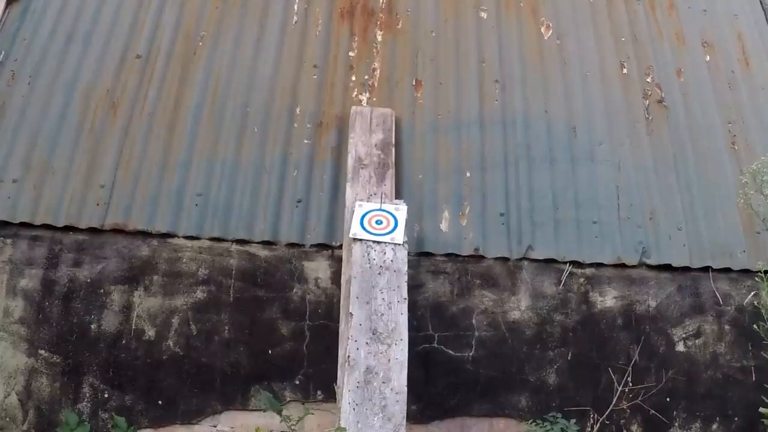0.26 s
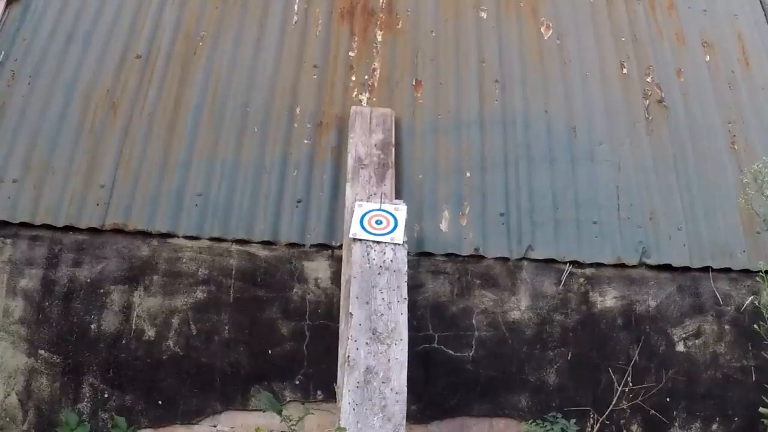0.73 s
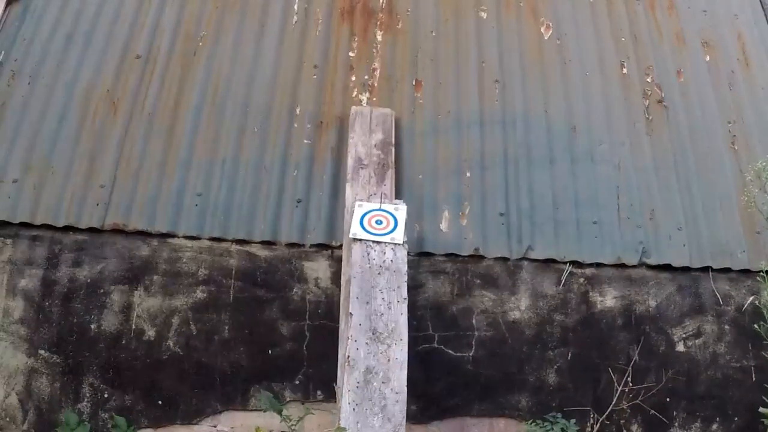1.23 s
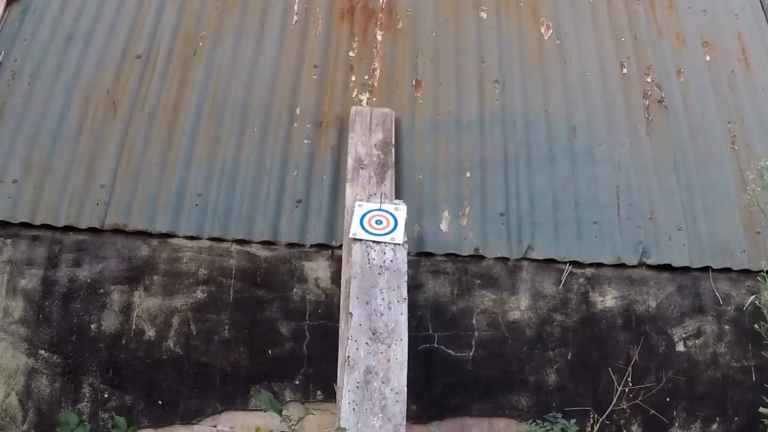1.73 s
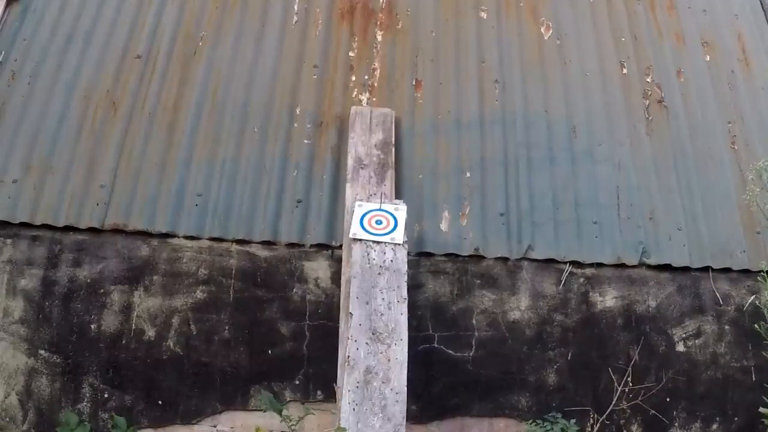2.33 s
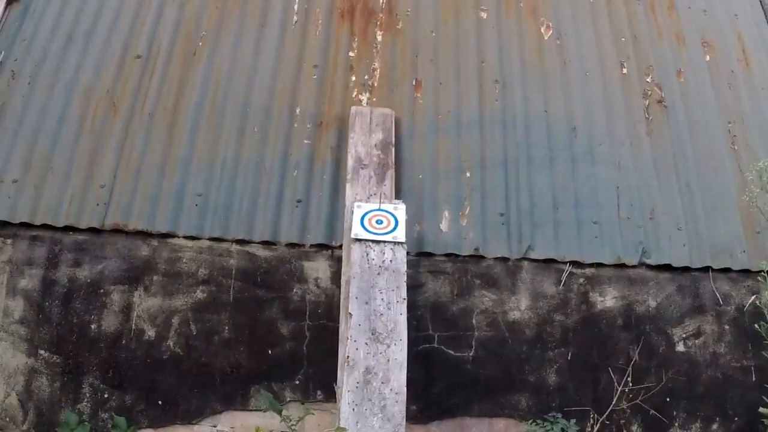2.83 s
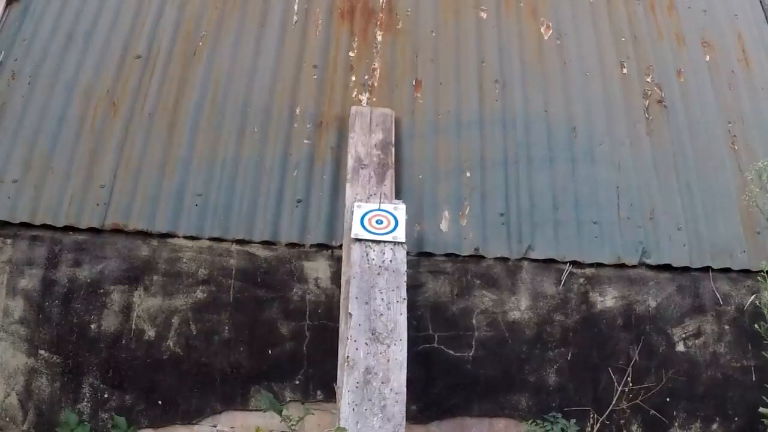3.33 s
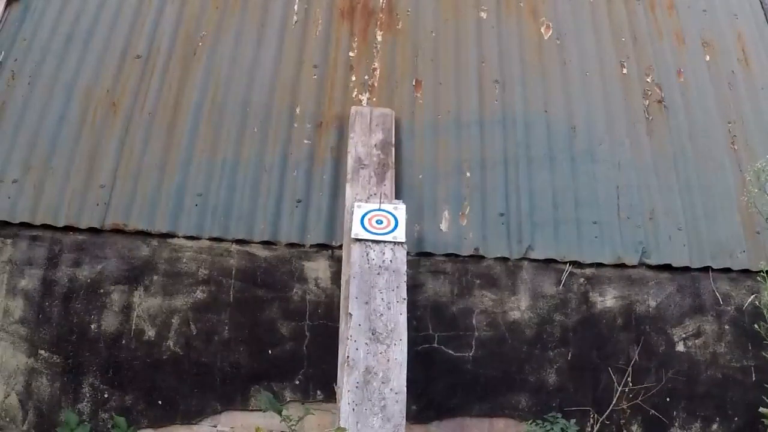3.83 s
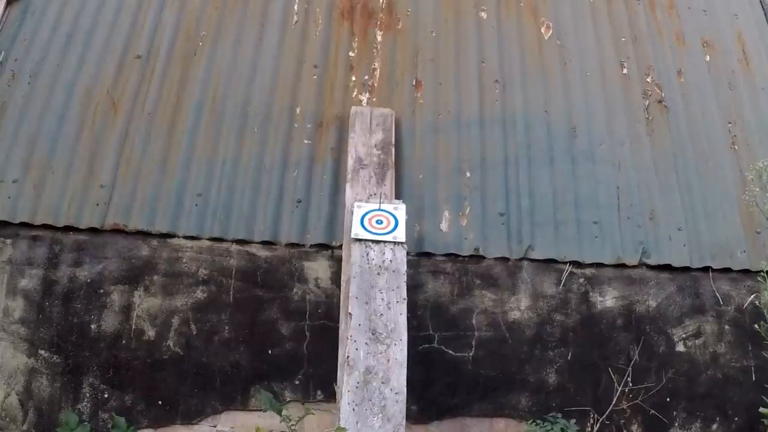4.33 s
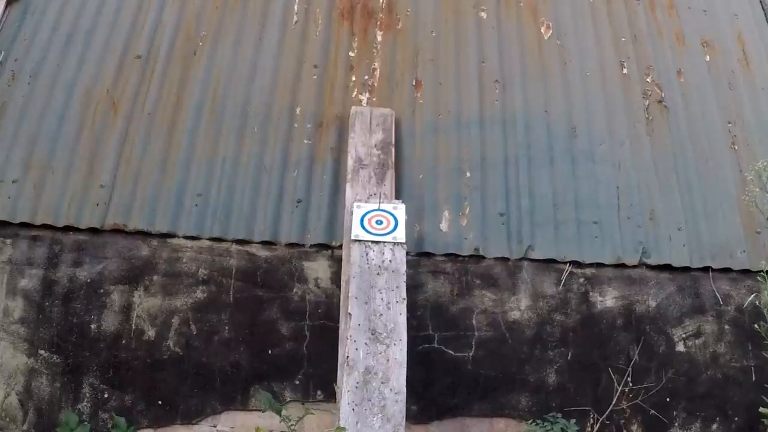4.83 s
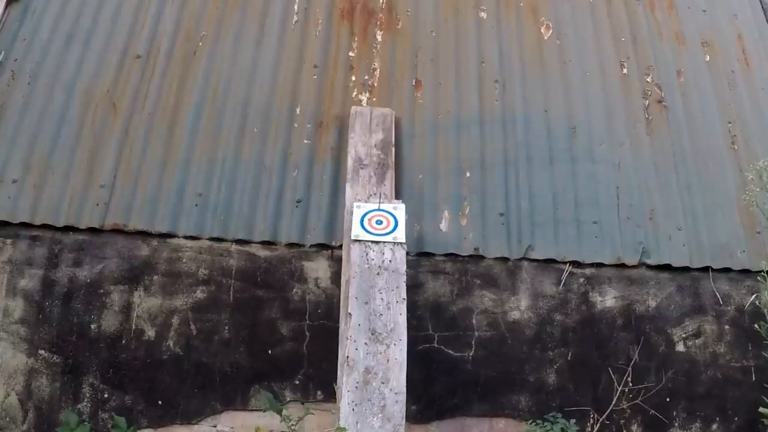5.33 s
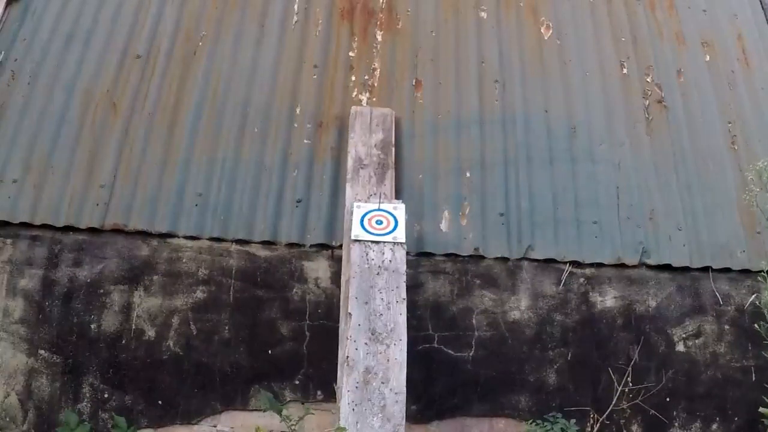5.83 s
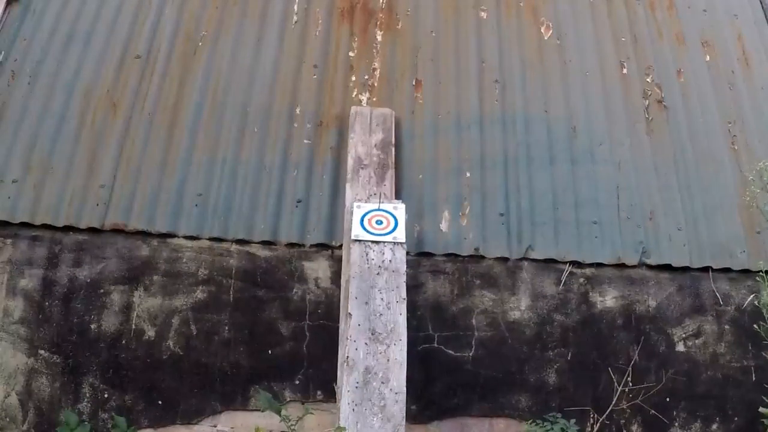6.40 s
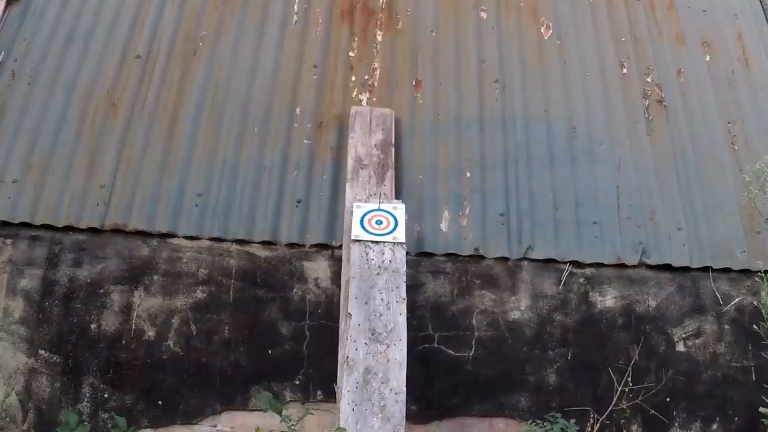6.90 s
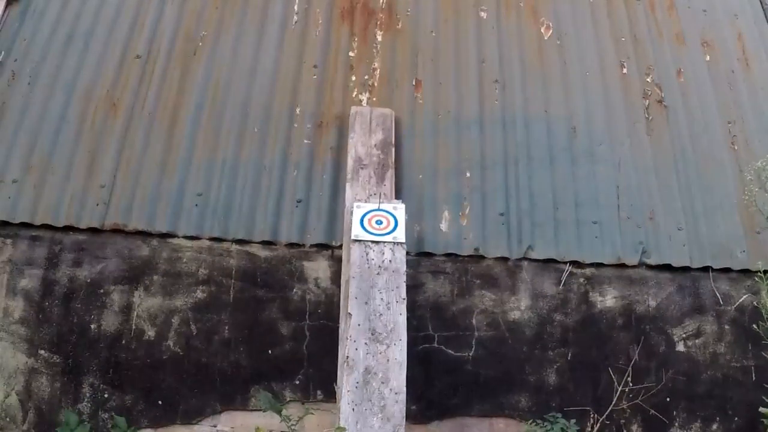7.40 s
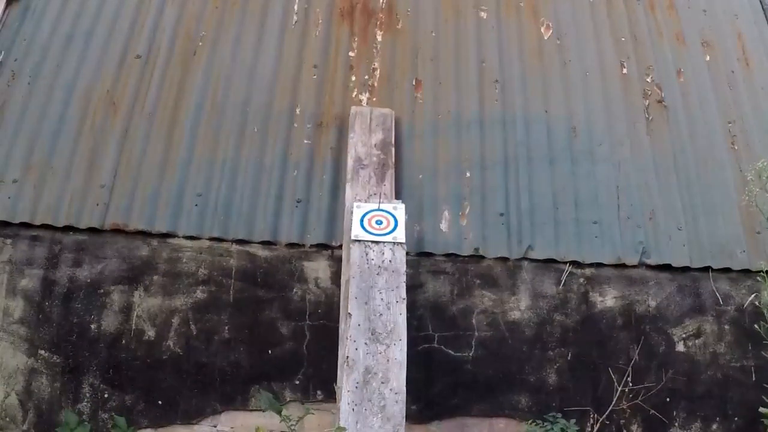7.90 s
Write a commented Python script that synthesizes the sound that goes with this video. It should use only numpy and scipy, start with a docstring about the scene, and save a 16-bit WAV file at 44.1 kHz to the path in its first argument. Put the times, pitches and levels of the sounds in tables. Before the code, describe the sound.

A quiet yard with a thin, slightly wavering high hiss, an air gun handled close to the microphone. At 0.4 s comes the strongest snap: three sharp contacts within a few milliseconds, a short bright metallic ring and a faint hollow low tail. A breathy swish of air swells, peaks near 0.8 s and dies away, with a tiny scuff at 1.1. A light latch click falls at 1.5, then a dull touch. A lighter snap, slightly left, comes at 2.7; faint bird-like whistles lie around 2.4 to 3.4. Another touch and click follow at 3.5, with soft insect-like chirrs from 3.7 to 5.4. A dry, sharp snap at 4.8, a click at 5.8, then a full snap at 6.8 followed by a left-side click. Dry scuffs, mostly left, run from 6.6 to 7.8, with another click at 7.8. A last lighter snap lands at 8.1. The hiss dips briefly around each snap.

```python
"""An air gun is worked close by in a quiet yard: five snaps, each three sharp contacts exciting the body.
Contacts are decaying pulses with noise rattles; the body answers with damped sines and shaped noise.
Lighter latch clicks and dull touches fall between, and low tones and a wash linger after each snap.
A swish of swelling noise follows the first snap; dry scuffs, mostly on the left, are noise under short bells.
A thin wavering hiss with faint chirrs and whistles lies beneath and dips briefly around each snap."""
import sys
import numpy as np
from scipy.fft import rfft, irfft, next_fast_len
from scipy.io import wavfile
from scipy.ndimage import map_coordinates

SR = 44100
rng = np.random.default_rng(int(sys.argv[2]) if len(sys.argv) > 2 else 0)


def transcribe(signal):
    """Save signal, clipped to [-1, 1], as a 16-bit WAV file at the path in sys.argv[1]."""
    frames = np.atleast_2d(signal).T
    limited = np.clip(frames, -1, 1)
    pcm = np.round(limited * 32767).astype(np.int16)
    wavfile.write(sys.argv[1], SR, pcm)


N = 359415
TIME = np.arange(N) / SR
SHORT = np.arange(SR // 8) / SR  # time axis of one brief sound, s

# Base level of the hiss, before the offset of each band: [t/s, level/dB]
HISS_LEVEL = [(1.05, -49), (1.86, -49.5), (2.29, -49), (4.29, -51), (4.87, -50.5), (6.29, -49.5),
              (6.82, -50.5), (6.98, -49.5), (7.58, -51), (8.15, -49.5)]
# Spectra of the hiss, its top fizz and its low floor: [f/Hz, relative level/dB]
HISS_SPECTRUM = [(1120, -28), (1900, -7), (2170, -2.5), (2790, -3), (3410, -7.5), (3860, -2.5),
                 (4230, -4.5), (4430, -2), (4720, -7.5), (4820, -5.5), (5600, -12), (7280, -40),
                 (12300, -120)]
FIZZ_SPECTRUM = [(3180, -38), (5400, -17), (5700, -7.5), (6270, -4), (8470, -7.5), (15100, -6),
                 (16000, -4.5)]
LOW_SPECTRUM = [(15, -36), (25, -3.5), (227, -4.5), (253, -1), (281, -5.5), (414, -3.5), (933, -4.5),
                (1700, -4), (2210, -5), (3740, -120)]
# Spectrum of the rustle within the hiss: [f/Hz, relative level/dB]
RUSTLE_SPECTRUM = [(2500, -50), (4200, 1), (5300, -5.5), (6500, -3.5), (9000, -12), (15000, -49)]
# Left-right correlation of the background: [f/Hz, correlation]
BACKGROUND_CORRELATION = [(60, 0.031), (150, 0.12), (380, 0.17), (950, 0.0076), (2380, 0.34),
                          (5980, -0.019), (15000, -0.76)]
# Faint chirrs: [t/s, f/Hz]
CHIRR_EVENTS = [(3.726, 4500), (4.38, 4400), (4.99, 4050), (5.357, 4290)]
# Faint whistles: [t/s, peak level/dB, f/Hz]
WHISTLE_EVENTS = [(2.43, -58, 4550), (2.92, -55, 4605), (3.1, -57, 4555), (3.42, -51.5, 4580)]
# Soft scuffs: [t/s, level/dB, standard deviation of the bell/s]
SCUFF_EVENTS = [(1.093, -42, 0.0025), (6.555, -42, 0.017), (6.582, -39, 0.0054), (7.039, -41, 0.0076),
                (7.121, -43.5, 0.018), (7.214, -44.5, 0.007), (7.545, -37, 0.0016), (7.596, -48, 0.023),
                (7.6105, -33.5, 0.002), (7.6175, -30.5, 0.0015), (7.812, -44, 0.013)]
# Spectrum of a scuff: [f/Hz, relative level/dB]
SCUFF_SPECTRUM = [(200, -45), (1400, -43), (1900, 3.5), (2400, 7), (3500, -4), (5000, -13), (12000, -51)]
# Spectra of the swish's main flow and bright edge: [f/Hz, relative level/dB]
AIR_SPECTRUM = [(1120, -34), (1900, -0.5), (2740, -1), (3050, -1), (4020, -4), (7840, -17.5), (8500, -22),
                (14600, -18), (16000, -29)]
EDGE_SPECTRUM = [(2000, -23), (5000, 1.5), (8000, 1.5), (13000, -4.5), (16000, -6)]
# Spectrum of the low rush, also of the lingering wash: [f/Hz, relative level/dB]
RUSH_SPECTRUM = [(30, -27), (100, -7.5), (250, -7.5), (450, -4.5), (560, -8), (800, -2), (1300, -3.5),
                 (1800, -2), (2400, -39)]
# Resonances in the low rush: [f/Hz, width/Hz, gain/dB]
RUSH_RESONANCES = [(260.6, 16, 13), (422, 20, 13), (664, 29, 13.5), (1330, 40, 2)]
# Faint lingering tones: [f/Hz, relative level/dB, t60/s]
HOLLOW_TONES = [(267, 0, 0.63), (420, 1, 0.66), (650, -4, 0.5), (950, -9, 0.55), (1280, -11, 0.27)]
# Light latch clicks: [t/s, spike level/dB, thud level/dB, left-right difference/dB]
LATCH_CLICKS = [(1.4952, -14.5, -29, -2), (3.5763, -18.5, -33.5, 1.5), (5.7638, -18, -23.5, 1),
                (6.8514, -16, -25.5, 9), (6.8861, -34.5, -45, 12), (7.7892, -18, -50, 0.5)]
# Spectrum of the crowded body modes: [f/Hz, relative level/dB]
BODY_SPECTRUM = [(1500, -27), (2050, -6), (2500, -1), (3100, -5), (3800, -0.5), (4400, -16.5), (4800, -9),
                 (5600, -20), (9000, -34)]
# Spectrum of the sizzle of thin steel parts: [f/Hz, relative level/dB]
SIZZLE_SPECTRUM = [(5000, -21), (10500, -5), (12500, 8), (15500, 0), (17000, -23)]
# Spectrum of the rattle of a contact: [f/Hz, relative level/dB]
RATTLE_SPECTRUM = [(60, -2), (300, -1.5), (1100, 6), (1700, -6), (2300, 5), (4000, 4), (7000, 6),
                   (12000, 6.5), (15800, 3), (16900, -29)]
# Snaps of the action: [t/s, opening contact level/dB, closing contact level/dB, force on the body/dB,
# left-right difference/dB, dip of the quiet sounds/dB]
SNAP_EVENTS = [(0.3966, -27, -4.5, 2.5, 0.5, 9.5), (2.7162, -26, -5.5, -14, 4, 3),
               (4.8060, -2.5, -17, -20, 1, 11.5), (6.7680, -5, -4, -0.5, -0.5, 9),
               (8.1365, -15.5, -11.5, -14, 2, 10)]

# Background. Band offsets are relative to the base level of the hiss.
TOP_HZ = 16900  # upper limit of the whole sound
HISS_START_HZ, HISS_TOP_HZ = 1857, 15900  # steep edges of the thin bands
HISS_OFFSET_DB, FIZZ_OFFSET_DB = 0.48, -1.07
RUSTLE_OFFSET_DB, RUSTLE_SWING_DB, RUSTLE_RATE = -13, 3, 9.1  # rate: random knots a second
CHIRR_GAIN_DB, CHIRR_S, CHIRR_WIDTH_HZ = -47.5, 0.042, 360
WHISTLE_S, WHISTLE_WAVER_HZ = 0.06, 9.1
SCUFF_PAN_DB, SCUFF_GRAIN_DB, SCUFF_GRAIN_RATE = 16, 1.8, 250  # L-R; unevenness; knots a second

# Swish: time of its height, half-width of its core, power-law steepness of its flanks
SWISH_S, SWISH_WIDTH_S, SWISH_FALL = 0.781, 0.023, 0.61
SWISH_START_S, SWISH_ATTACK_S = 0.44, 0.065  # the air begins to move and fades in
SWISH_FLUTTER_DB, SWISH_FLUTTER_RATE = 1.1, 220  # unevenness of the flow; knots a second
AIR_DB, EDGE_DB = -28.5, -30.5
EDGE_LEAD_S, EDGE_WIDTH_S, EDGE_FALL = 0.007, 0.034, 2.1  # the edge peaks earlier, with steeper flanks
RUSH_DB, RUSH_LAG_S = -46.5, 0.017  # the low rush peaks just after
RUSH_RISE_DB_PER_S, RUSH_FALL_DB_PER_S = 252, 182

# Gun. GAIN is in dB at full force or contact; GROWTH is in dB per dB of force or contact.
CATCH_DELAY_S, CLOSE_DELAY_S = 0.0045, 0.0059  # after the opening contact
CATCH_SPIKE_DB, CATCH_RATTLE_DB = -16, -15.5  # alike in every snap
OPEN_RATTLE_GAIN, OPEN_RATTLE_GROWTH = -14.5, 0.28
CLOSE_RATTLE_GAIN, CLOSE_RATTLE_GROWTH = -14.5, 0.95
LATCH_RATTLE_GAIN, LATCH_RATTLE_GROWTH = -24, 0.31
THUD_DB = -19  # low push of a contact, relative to its spike
TOUCHES_S, TOUCH_DB = [1.579, 3.522, 5.738, 7.861], -41  # faint dull touches on the gun
RING_GAIN, RING_GROWTH = -18.5, 0.83
NOTE_GAIN, NOTE_GROWTH = -10.5, 2.2
SIZZLE_GAIN, SIZZLE_GROWTH = -21.5, 1.1
KNOCK_GAIN, KNOCK_GROWTH = -20.5, 1.8
LINGER_GAIN, LINGER_GROWTH = -62, 1.17


def amp(db):
    """Logarithmic level: decibels become an amplitude ratio."""
    return 10 ** (np.asarray(db) / 20)


def unit(x):
    """Normalisation: the signal is scaled to rms 1."""
    return x / np.sqrt(np.mean(x ** 2) + 1e-20)


def along(points, hz):
    """Logarithmic frequency scale: (f/Hz, value) points are joined on it."""
    f, values = np.transpose(points)
    return np.interp(np.log(hz + 1), np.log(f + 1), values)


def curves(rows):
    """Linear interpolation in time: one curve for each column after t/s."""
    s, *columns = np.transpose(rows)
    return [np.interp(TIME, s, column) for column in columns]


def wobble(rate):
    """Slow random modulation: a smooth curve through random knots, rate of them a second."""
    knots = rng.standard_normal(int(N * rate / SR) + 4)
    return map_coordinates(knots, [TIME * rate])


def filtered(x, response):
    """Linear filtering: the spectrum is multiplied by a frequency response."""
    m = next_fast_len(N + SR // 2)
    spectrum = rfft(x, m) * response(np.fft.rfftfreq(m, 1 / SR))
    return irfft(spectrum, m)[..., :N]


def fade(t, t60):
    """Exponential damping: a decay of 60 dB in t60 seconds."""
    return np.exp(-np.log(1000) * t / t60)


def bell(s, length):
    """Gaussian envelope: a smooth swell centred on s with standard deviation length."""
    return np.exp(-.5 * ((TIME - s) / length) ** 2)


def swell(s, width, fall):
    """Power-law envelope: a rounded peak at s with long flanks."""
    return (1 + ((TIME - s) / width) ** 2) ** -fall


def panned(pan_db):
    """Level-difference panning: left and right gains of constant total power."""
    return unit(amp([[pan_db / 2], [-pan_db / 2]]))


def add(track, s, sound):
    """Superposition: a sound is summed into a track at time s."""
    part = track[..., round(s * SR):][..., :sound.shape[-1]]
    part += sound[..., :part.shape[-1]]


def noise(spectrum, correlation):
    """Partial coherence: mid and side noises mix to rms 1 with the given left-right correlation."""
    def shape(hz):
        angle = np.arccos(np.clip(along(correlation, hz), -1, 1)) / 2
        return amp(along(spectrum, hz)) * np.array([np.cos(angle), np.sin(angle)])

    mid, side = filtered(rng.standard_normal((2, N)), shape)
    return unit(np.array([mid + side, mid - side]))


def thin(x):
    """Band limitation: the treble passes between a steep lower edge and an upper cutoff."""
    def response(hz):
        lower_edge = (1 + np.tanh((hz - HISS_START_HZ) / 110)) / 2
        return (hz < HISS_TOP_HZ) * lower_edge

    return filtered(x, response)


def chirrs():
    """Amplitude modulation: low noise on sine carriers gives brief narrow bands, like far insects."""
    low_noise = filtered(rng.standard_normal((2, N)), lambda f: np.exp(-(f / CHIRR_WIDTH_HZ) ** 2))
    carriers = sum(bell(s, CHIRR_S) * np.sin(2 * np.pi * hz * TIME) for s, hz in CHIRR_EVENTS)
    return amp(CHIRR_GAIN_DB) * unit(low_noise) * carriers


def whistles():
    """Frequency modulation: random drift makes thin tones waver slightly, like a far bird."""
    drift = np.cumsum(WHISTLE_WAVER_HZ * wobble(22)) / SR  # cycles
    track = np.zeros(N)
    for s, db, hz in WHISTLE_EVENTS:
        track += amp(db) * bell(s, WHISTLE_S) * np.sin(2 * np.pi * (hz * TIME + drift))
    return track


def background():
    """Filtered random noise: hiss, fizz and rustle waver in level over a low floor."""
    level_db, = curves(HISS_LEVEL)
    waver = wobble(14)
    hiss_db = level_db + HISS_OFFSET_DB + 0.39 * waver + 0.59 * wobble(22)
    hiss = amp(hiss_db) * unit(thin(noise(HISS_SPECTRUM, BACKGROUND_CORRELATION)))
    fizz_db = level_db + FIZZ_OFFSET_DB + 0.28 * waver
    fizz = amp(fizz_db) * unit(thin(noise(FIZZ_SPECTRUM, BACKGROUND_CORRELATION)))
    rustle_db = level_db + RUSTLE_OFFSET_DB + RUSTLE_SWING_DB * wobble(RUSTLE_RATE)
    rustle = amp(rustle_db) * noise(RUSTLE_SPECTRUM, BACKGROUND_CORRELATION)
    low = amp(-69) * noise(LOW_SPECTRUM, BACKGROUND_CORRELATION)
    return (hiss + fizz + rustle) * panned(pan_db=0.5) + low + chirrs() + whistles()


def dip():
    """Gain modulation: the level dips briefly, deepest 38 ms after each snap's opening contact."""
    return amp(-sum(depth_db * bell(s + 0.038, 0.031) for s, *_, depth_db in SNAP_EVENTS))


def scuffs():
    """Friction noise: small dry rubs, louder on the left, with an uneven random grain."""
    envelope = sum(amp(db) * bell(s, length) for s, db, length in SCUFF_EVENTS)
    grain = amp(SCUFF_GRAIN_DB * wobble(SCUFF_GRAIN_RATE))
    return envelope * grain * panned(SCUFF_PAN_DB) * noise(SCUFF_SPECTRUM, [(2500, 0.43)])


def rush_resonances(f):
    """Resonance: each peak adds a Lorentzian gain to a flat response."""
    return 1 + sum(amp(db) / (1 + (2 * (f - hz) / width) ** 2) for hz, width, db in RUSH_RESONANCES)


def swish():
    """Flow noise: a rush of air swells and dies, bright at its height, with low resonances."""
    onset = np.clip((TIME - SWISH_START_S) / SWISH_ATTACK_S, 0, 1)
    flutter = amp(SWISH_FLUTTER_DB * wobble(SWISH_FLUTTER_RATE))

    air_noise = unit(thin(noise(AIR_SPECTRUM, [(2000, 1.0), (10000, 0.85)])))
    air = amp(AIR_DB) * swell(SWISH_S, SWISH_WIDTH_S, SWISH_FALL) * air_noise

    edge_noise = unit(thin(noise(EDGE_SPECTRUM, [(8000, 0.18)])))
    edge = amp(EDGE_DB) * swell(SWISH_S - EDGE_LEAD_S, EDGE_WIDTH_S, EDGE_FALL) * edge_noise

    t = TIME - SWISH_S - RUSH_LAG_S
    rush_db = RUSH_DB + np.minimum(RUSH_RISE_DB_PER_S * t, -RUSH_FALL_DB_PER_S * t)
    rush = amp(rush_db) * unit(filtered(noise(RUSH_SPECTRUM, [(500, 0.78)]), rush_resonances))
    return onset * flutter * (air + edge + rush)


def closings():
    """Impulsive excitation: the blows that reach the body, as rows (t/s, force/dB)."""
    return [(s + CLOSE_DELAY_S, force_db) for s, _, _, force_db, *_ in SNAP_EVENTS]


def linger():
    """Free decay: low hollow tones and a faint diffuse wash hang on after each snap."""
    t = np.arange(SR) / SR
    tones = sum(amp(db) * np.sin(2 * np.pi * hz * t) * fade(t, t60) for hz, db, t60 in HOLLOW_TONES)
    track, wash = np.zeros(N), np.zeros(N)
    for s, force_db in closings():
        linger_db = LINGER_GAIN + LINGER_GROWTH * force_db
        add(track, s, amp(linger_db) * tones)
        add(wash, s, amp(linger_db + 11.5) * fade(t, 0.42))
    return track + wash * noise(RUSH_SPECTRUM, [(500, 0.75)])


def clicks(rows, rattle_t60, scatter_db, scatter_t60, spike_s):
    """Impact: a sharp pressure spike, a brief rattle and a weaker scatter from things nearby."""
    spikes, power = np.zeros((2, N)), np.zeros((2, N))
    u = SHORT / spike_s
    spike = (1 - u / 2) * np.exp(-u)
    decay = fade(SHORT, rattle_t60) + amp(scatter_db) * fade(SHORT, scatter_t60)
    for s, spike_db, rattle_db, pan_db in rows:
        gains = panned(pan_db)
        add(spikes, s, amp(spike_db) * gains * spike)
        add(power, s, (amp(rattle_db) * gains * decay) ** 2)  # overlapping rattles add in power
    rattle = noise(RATTLE_SPECTRUM, [(1000, 0.43), (4000, 0.5), (10000, 0.65)])
    return spikes + np.sqrt(power) * rattle


def latch():
    """Second-order resonance: light clicks lose their bass and gain a woody knock near 1 kHz."""
    rows = [(s, db, LATCH_RATTLE_GAIN + LATCH_RATTLE_GROWTH * db, pan_db)
            for s, db, _, pan_db in LATCH_CLICKS]
    ticks = clicks(rows, rattle_t60=0.0058, scatter_db=-9.5, scatter_t60=0.037, spike_s=.00008)

    def response(hz):
        knock = 1j * hz * 700 / (1050 ** 2 - hz ** 2 + 1j * hz * 700)
        no_bass = -hz ** 2 / (520 ** 2 - hz ** 2 + 1j * hz * 520)
        return no_bass * (1 + amp(-23) * knock)

    return filtered(ticks, response)


def contacts():
    """Impact sequence: opening, catch and closing, rows (t/s, spike/dB, rattle/dB, L-R/dB)."""
    rows = []
    for s, open_db, close_db, force_db, pan_db, _ in SNAP_EVENTS:
        open_rattle_db = OPEN_RATTLE_GAIN + OPEN_RATTLE_GROWTH * open_db
        close_rattle_db = CLOSE_RATTLE_GAIN + CLOSE_RATTLE_GROWTH * force_db
        rows += [(s, open_db, open_rattle_db, pan_db),
                 (s + CATCH_DELAY_S, CATCH_SPIKE_DB, CATCH_RATTLE_DB, pan_db),
                 (s + CLOSE_DELAY_S, close_db, close_rattle_db, pan_db)]
    return rows


def taps():
    """Low-frequency pulse: one dull push for each contact, latch click and touch."""
    pushes = [(s, spike_db + THUD_DB) for s, spike_db, *_ in contacts()]
    pushes += [(s, thud_db) for s, _, thud_db, _ in LATCH_CLICKS]
    pushes += [(s, TOUCH_DB) for s in TOUCHES_S]
    track = np.zeros(N)
    u = SHORT / 0.00033
    push = u * np.exp(-u) * (1 - u / 4)
    for s, db in pushes:
        add(track, s, amp(db) * push)
    return track


def damped_tone(hz, t60):
    """Damped oscillation: a sine decaying exponentially."""
    return np.sin(2 * np.pi * hz * SHORT) * fade(SHORT, t60)


def body():
    """Modal response: a blow excites crowded modes, a strong note, a steel sizzle and a dull knock."""
    ring, sizzle, notes = np.zeros(N), np.zeros(N), np.zeros(N)
    rise = 1 - np.exp(-SHORT / 0.0011)
    note = rise * damped_tone(2430, 0.013)
    knock = rise * (damped_tone(1095, 0.01) + damped_tone(574, 0.0081))
    for s, force_db in closings():
        add(ring, s, amp(RING_GAIN + RING_GROWTH * force_db) * rise * fade(SHORT, 0.048))
        add(sizzle, s, amp(SIZZLE_GAIN + SIZZLE_GROWTH * force_db) * rise * fade(SHORT, 0.043))
        add(notes, s, amp(NOTE_GAIN + NOTE_GROWTH * force_db) * note)
        add(notes, s, amp(KNOCK_GAIN + KNOCK_GROWTH * force_db) * knock)
    ringing = ring * noise(BODY_SPECTRUM, [(3000, 1.0)])
    sizzling = sizzle * noise(SIZZLE_SPECTRUM, [(12000, .2)])
    return ringing + sizzling + notes


def action():
    """Repeated impact: the three contacts of every snap, each very short."""
    return clicks(contacts(), rattle_t60=0.0013, scatter_db=-6.0, scatter_t60=0.018, spike_s=.000045)


def scene():
    """Superposition: gun, swish and scuffs over the lingering tones and background, which dip."""
    quiet = dip() * (linger() + background())
    gun = action() + latch() + taps() + body()
    return gun + swish() + scuffs() + quiet


def record(dry):
    """Band limitation: nothing passes at or above the upper limit."""
    return filtered(dry, lambda hz: hz < TOP_HZ)


dry = scene()
out = record(dry)
transcribe(out)
```